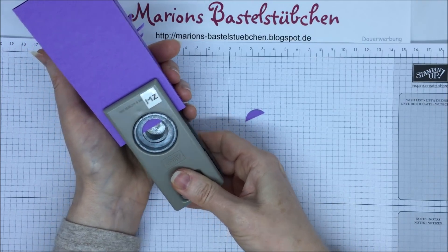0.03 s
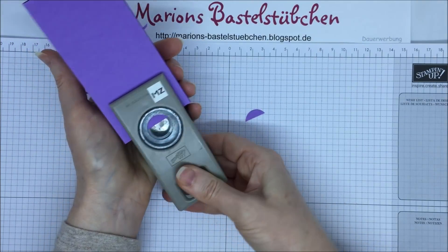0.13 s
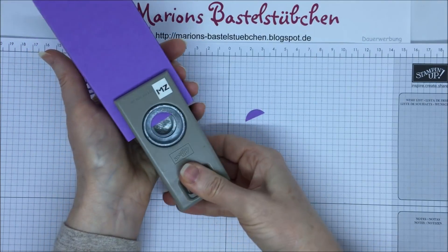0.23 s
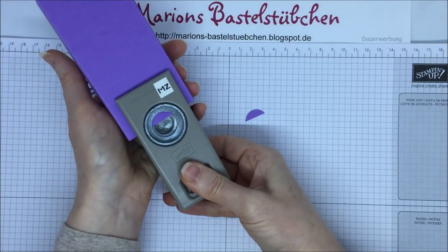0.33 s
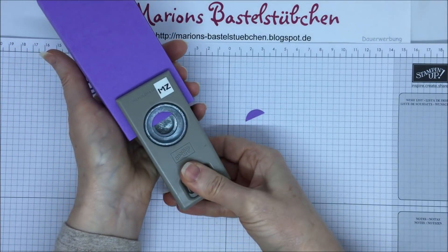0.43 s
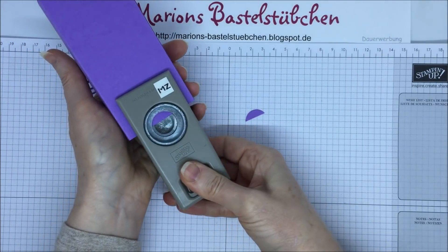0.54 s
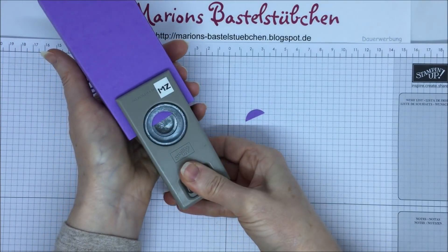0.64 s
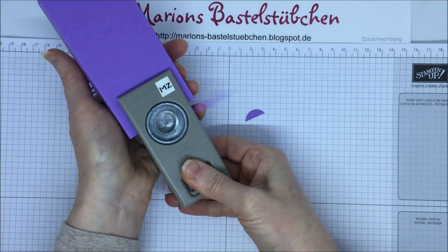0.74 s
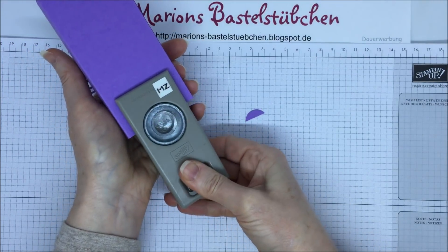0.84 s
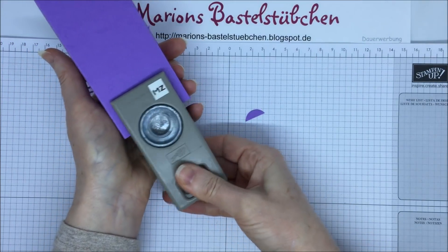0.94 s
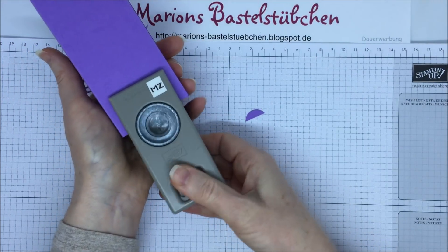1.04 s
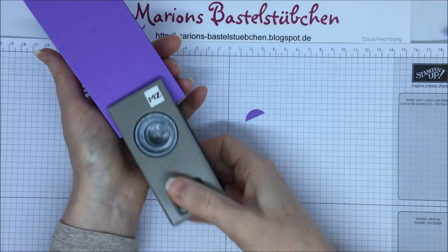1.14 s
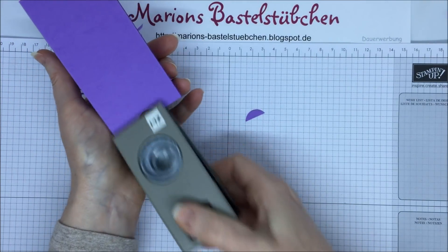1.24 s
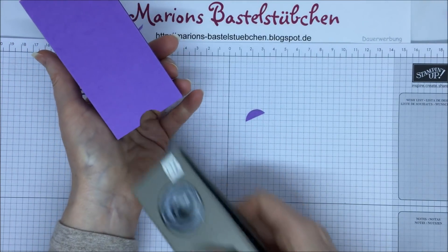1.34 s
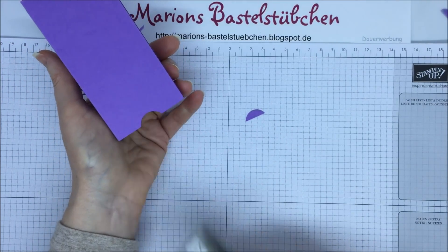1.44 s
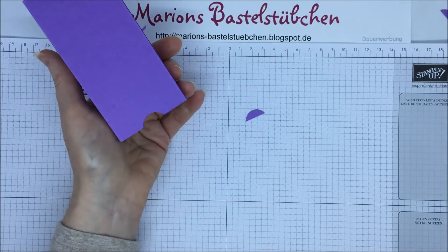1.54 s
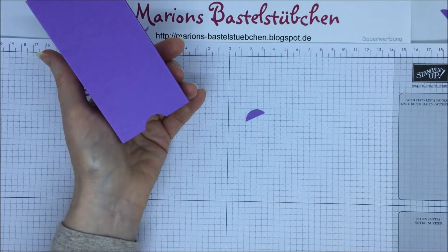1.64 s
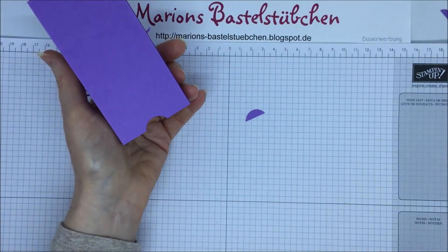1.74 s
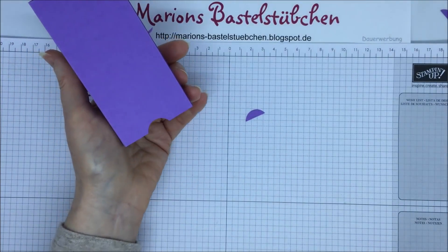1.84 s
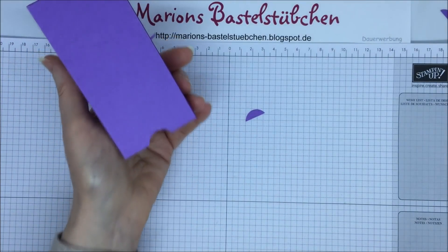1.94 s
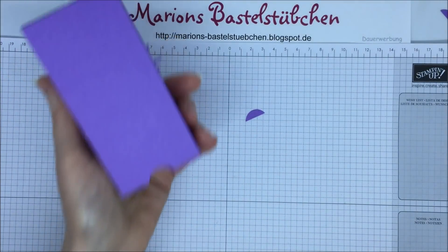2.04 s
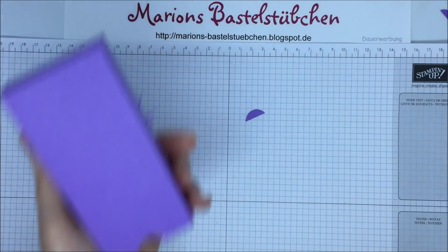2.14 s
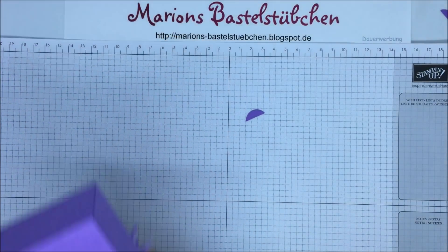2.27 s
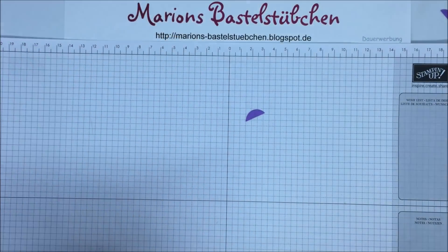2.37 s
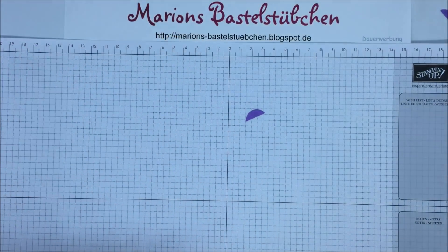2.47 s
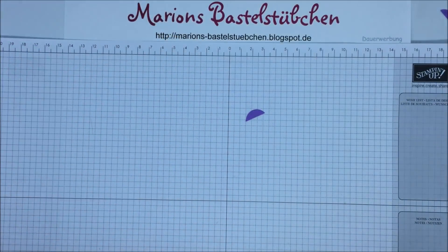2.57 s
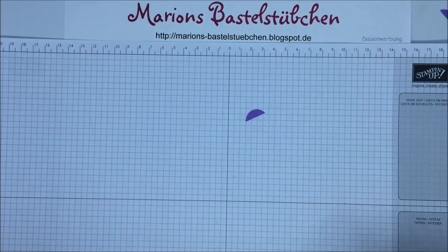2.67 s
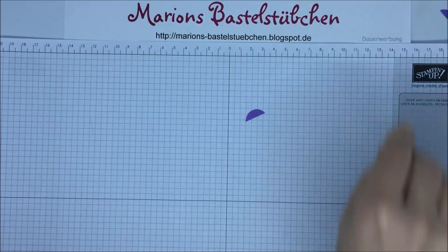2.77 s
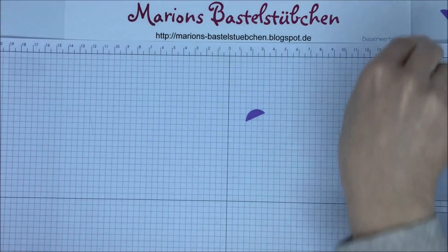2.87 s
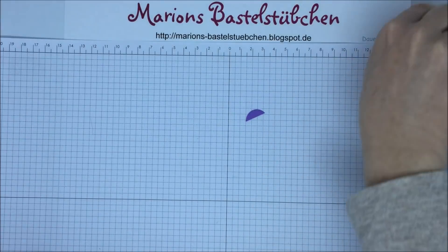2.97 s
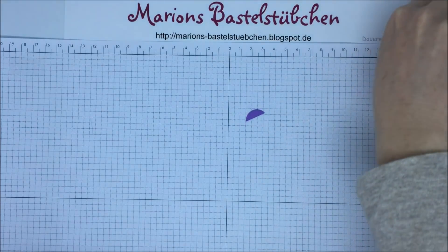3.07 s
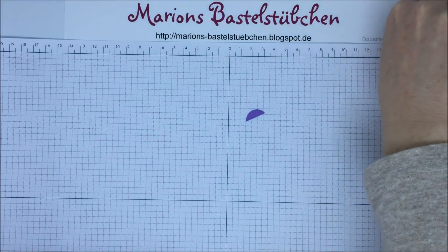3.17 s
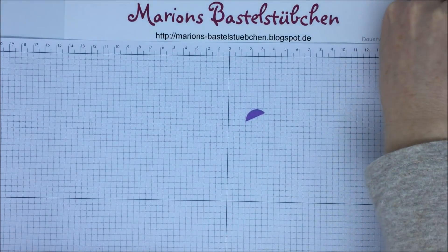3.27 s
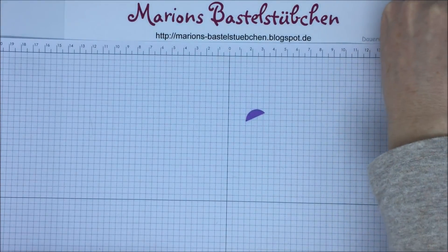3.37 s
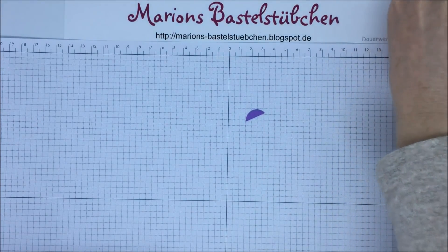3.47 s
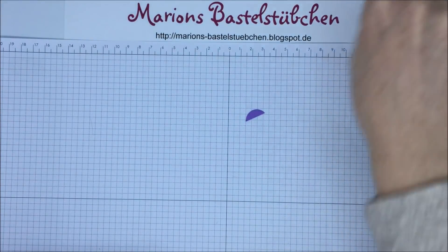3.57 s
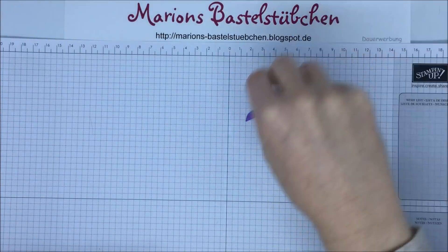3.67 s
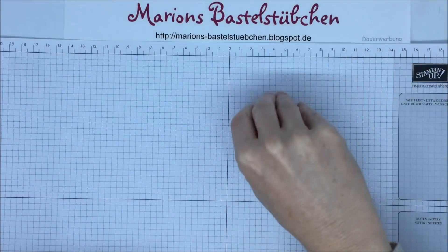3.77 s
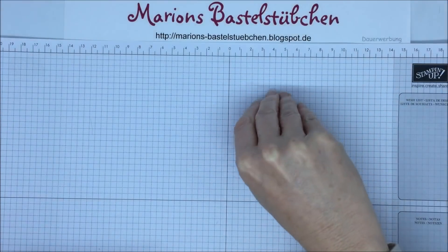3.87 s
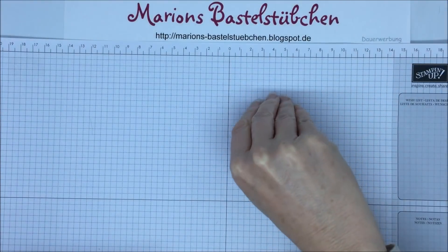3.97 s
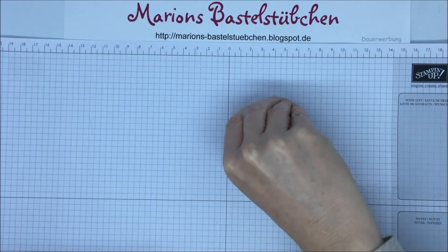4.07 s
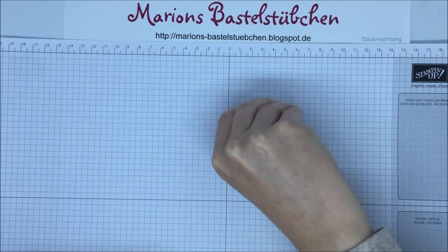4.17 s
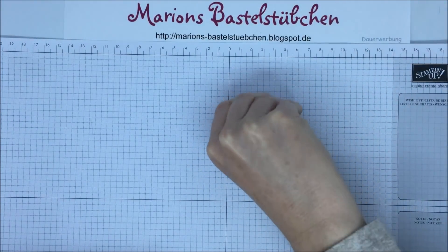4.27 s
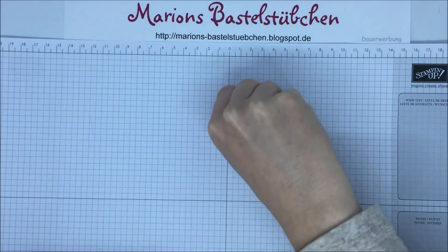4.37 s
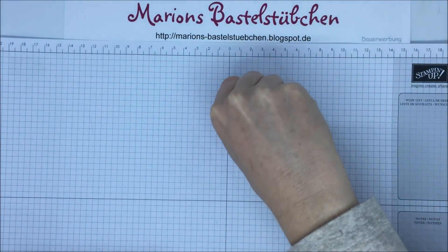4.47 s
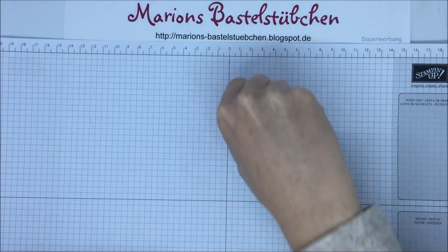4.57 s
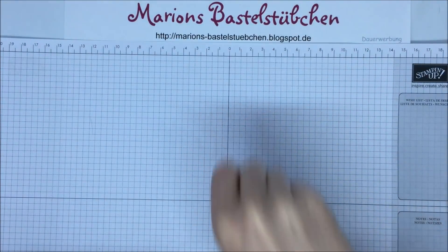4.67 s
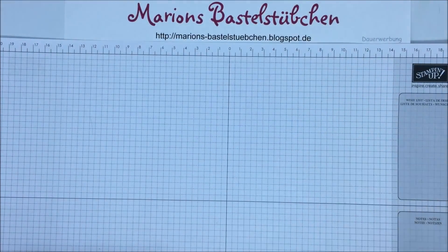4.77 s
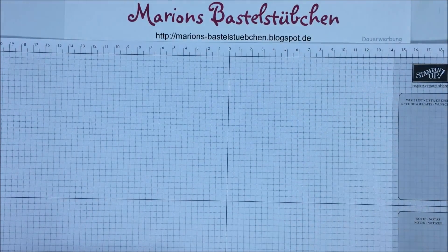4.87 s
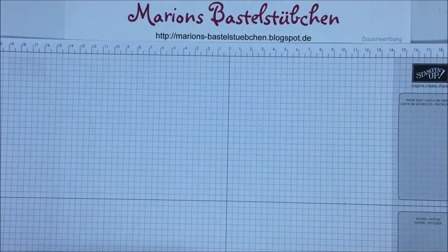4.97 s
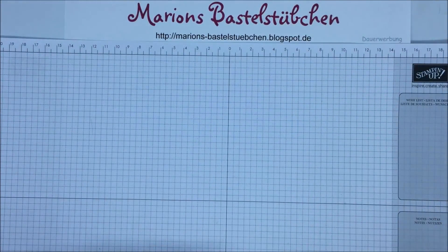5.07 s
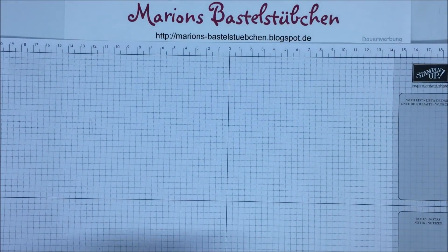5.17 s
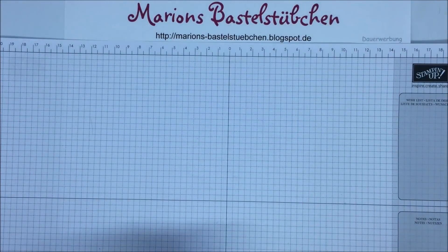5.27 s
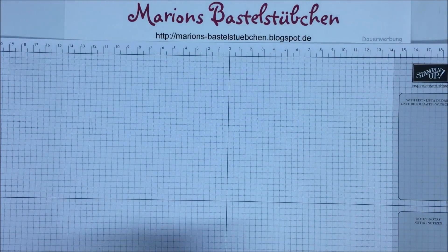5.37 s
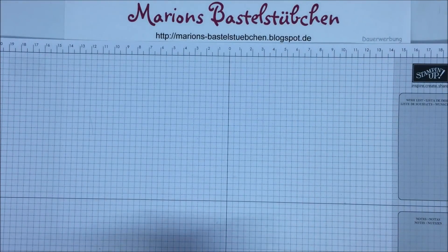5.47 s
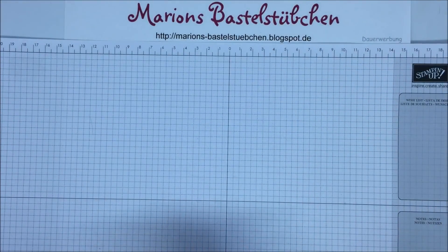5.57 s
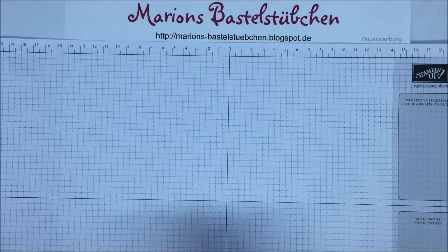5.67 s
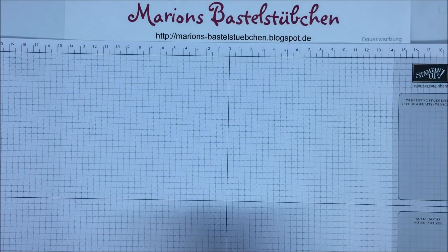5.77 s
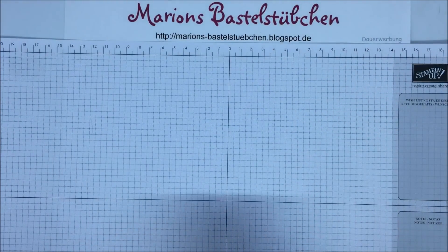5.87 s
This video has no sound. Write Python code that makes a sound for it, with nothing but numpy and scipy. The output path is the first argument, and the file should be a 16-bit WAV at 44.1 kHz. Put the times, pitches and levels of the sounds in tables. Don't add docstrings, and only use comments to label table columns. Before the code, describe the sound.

Hard double metallic snap of a craft punch close by, brief card scraping, a hollow clack and thump, then quiet paper ticks.

```python
import sys
import numpy as np
from scipy import signal
from scipy.fft import rfft, irfft, dct, next_fast_len
from scipy.io import wavfile
from scipy.ndimage import uniform_filter1d, map_coordinates

SR = 44100
rng = np.random.default_rng(int(sys.argv[2]) if len(sys.argv) > 2 else 0)


def convert_level_to_amplitude(level_db):
    exponent = np.asarray(level_db, float) / 20
    return 10 ** exponent


def wav_record(signal):
    frames = np.transpose(np.atleast_2d(signal))
    bounded = np.clip(frames, -1, 1)
    quanta = np.round(bounded * 32767).astype(np.int16)
    wavfile.write(sys.argv[1], SR, quanta)


N = 260565


def unit(x):
    return x / np.sqrt(np.mean(x ** 2) + 1e-20)


def peak_one(x):
    return x / np.max(np.abs(x))


def along(points, hz):
    f, v = np.transpose(points)
    return np.interp(np.log(hz + 1), np.log(f + 1), v)


def filtered(x, response):
    m = next_fast_len(x.shape[-1] + 8192)
    return irfft(rfft(x, m) * response(np.fft.rfftfreq(m, 1 / SR)), m)[..., :x.shape[-1]]


def band(f, lo_hz, hi_hz):
    return (1j * f / (lo_hz + 1j * f)) ** 2 / (1 + 1j * f / hi_hz) ** 2


def resonances(peaks):
    def response(f):
        total = 0
        for k, (center, width, db) in enumerate(peaks):
            damping = 1j * f * width
            total = total + (-1) ** k * convert_level_to_amplitude(db) * damping / (center * center - f * f + damping)
        return total
    return response


def noise(size, spectrum):
    return unit(filtered(rng.standard_normal(size), lambda hz: convert_level_to_amplitude(along(spectrum, hz))))


def wobble(rate):
    return map_coordinates(rng.standard_normal(int(N * rate / SR) + 4), [np.arange(N) * rate / SR])


# f/Hz, level per Hz/dB
HUM_COLOUR = [(12, -52), (22, -23), (44, -10), (70, -12.5), (113, 1), (145, -1.5), (167, -11.5),
              (233, -14.5), (268, -21.5), (407, -24.5), (890, -24.5), (2230, -27.5), (2570, -31.5),
              (2870, -29.5), (15800, -39)]


def hum():
    drift_db = 0.5 * wobble(1.5) + 0.6 * wobble(12)
    return convert_level_to_amplitude(-62.5 + drift_db) * noise(N, HUM_COLOUR)


def patchy(x, depth_db):
    z = signal.stft(x, nperseg=256)[2]
    field = uniform_filter1d(rng.standard_normal(z.shape), size=3, axis=0)
    field = uniform_filter1d(field, size=11, axis=1)
    return signal.istft(z * convert_level_to_amplitude(depth_db * unit(field)), nperseg=256)[1][:N]


def strokes(rows, attack, release):
    gains = np.zeros((3, N))
    for s, length, db, hiss_db, pad_db in rows:
        at = np.arange(round(s * SR), min(round((s + length) * SR), N))
        u = (at / SR - s) / length
        touch = np.clip(np.minimum(u / attack, (1 - u) / release), 0, 1) ** 2
        gains[:, at] += convert_level_to_amplitude(db + np.array([[0], [hiss_db], [pad_db]])) * touch
    return gains


def rubbing(gains, sheet, hiss, pad, grain_db):
    clumps = convert_level_to_amplitude(2.5 * wobble(60) + grain_db * wobble(400))
    sheet_grain = clumps * rng.standard_normal(N)
    pad_grain = clumps * rng.standard_normal(N)
    layers = [unit(filtered(sheet_grain, lambda f: resonances(sheet)(f) * band(f, 900, 5000))),
              unit(clumps * patchy(noise(N, hiss), depth_db=3.0)),
              unit(filtered(pad_grain, lambda f: resonances(pad)(f) ** 2))]
    return np.sum(gains * layers, axis=0)


# t/s, length/s, sheet level/dB, hiss over sheet/dB, pad over sheet/dB
SLEEVE_STROKES = [(0.148, 0.25, -76, 4.5, -7), (2.085, .105, -86, 12, 1), (2.885, .06, -84, 11, -6),
                  (2.7, .17, -76, -8, 9), (3.105, .03, -71, -12, -9), (2.966, .02, -82, 11, -4),
                  (4.4, 0.11, -79.5, 12, -3), (4.965, 0.1, -79, 11.5, -4), (5.665, 0.068, -70, 1, -5),
                  (5.545, .09, -73.5, 1, -3), (5.79, 0.07, -67, -4, -4.5)]
# t/s, length/s, sheet level/dB, hiss over sheet/dB, pad over sheet/dB
EDGE_FLICKS = [
    (3.214, 0.034, -72, -10, -24),
    (3.978, 0.052, -59, 1.5, -18),
    (5.378, 0.044, -59, 4.5, -26),
    (5.893, 0.041, -61.5, -1, 1.5),
]
# f/Hz, width/Hz, level/dB
EDGE_BODY = [(830, 330, -16), (1310, 270, 0.5), (2136, 460, 4), (3000, 250, -20)]
# f/Hz, level per Hz/dB
EDGE_HISS = [(1470, -22), (2500, -9), (3130, 2), (3700, -1), (7410, -4), (10400, -2), (11500, 1.5),
             (15800, -18)]
# f/Hz, width/Hz, level/dB
PAD_BODY = [(218, 80, 4.5), (555, 95, 2)]


def sleeve_and_edges():
    gains = strokes(SLEEVE_STROKES, attack=0.38, release=0.15)
    gains += strokes(EDGE_FLICKS, attack=0.15, release=0.44)
    return rubbing(gains, EDGE_BODY, EDGE_HISS, PAD_BODY, grain_db=2.0)


# t/s, level/dB, f/Hz, t60/s, snap over tick/dB
EDGE_TICKS = [(0.519, -57.5, 1900, 0.025, -11.5), (1.231, -34.5, 1690, 0.05, -10.5),
              (1.2994, -28, 1657, 0.026, -23), (1.3229, -14.5, 3800, 0.008, -20),
              (1.3242, -23, 2300, 0.02, -18), (1.3468, -33, 3800, 0.034, -14.5),
              (1.361, -29, 1800, 0.029, -15), (1.406, -29.5, 3810, 0.02, -10),
              (1.4322, -21, 2870, 0.011, -12), (1.6211, -49, 2242, 0.034, -30),
              (3.2779, -41, 2553, 0.022, -16), (3.217, -50, 4760, 0.07, -30),
              (4.2194, -51.5, 502, 0.032, -7), (5.384, -50.5, 1990, .03, -9),
              (4.4912, -42, 3000, 0.031, -23), (5.176, -56.5, 1100, 0.0199, -9)]
# f/Hz, level per Hz/dB
PAPER_HISS = [(1470, -18), (2500, 0), (2780, -14), (4030, -5), (4320, -3), (4670, -1), (7820, -5.5),
              (13600, -6), (15800, -16.5)]


def ticks():
    out, t = np.zeros(N + SR), np.arange(SR // 5) / SR
    for s, db, hz, t60, snap_db in EDGE_TICKS:
        fade = convert_level_to_amplitude(-60 * t / max(t60, 2e-3)) * (1 - np.exp(-t / 0.0003))
        puff = fade * rng.standard_normal(len(t))
        puff[9] += 4
        edge = resonances([(hz, 0.7 * hz, 0)])
        tone = filtered(puff, lambda f: edge(f) ** 2 * band(f, 0.1 * hz, 3 * hz))
        snap = fade * noise(len(t), PAPER_HISS)
        out[round(s * SR):][:len(t)] += convert_level_to_amplitude(db) * (peak_one(tone) + convert_level_to_amplitude(snap_db) * peak_one(snap))
    return out[:N]


# t/s, pressure level/dB
SLIDE_PRESSURE = [(1.255, -62), (1.285, -47.5), (1.303, -40), (1.325, -45), (1.338, -47), (1.35, -36),
                  (1.375, -37), (1.39, -38.5), (1.407, -40), (1.432, -40), (1.444, -62)]


def slide():
    s, db = np.transpose(SLIDE_PRESSURE)
    t = np.arange(N) / SR
    swing_db = np.interp(t, s, db) - db.mean()
    touch = np.clip(np.minimum(t - s[0], s[-1] - t) / 0.005, 0, 1)
    layers_db = np.array([swing_db, -9 + 1.1 * swing_db, -8 + swing_db])
    return touch * convert_level_to_amplitude(db.mean() + layers_db)


# t/s, length/s, sheet level/dB, hiss over sheet/dB, pad over sheet/dB
CARD_DRAGS = [(1.425, 0.049, -52, -22, -5.5), (1.317, .022, -51, -18, 4), (1.226, .02, -64, 4, 10),
              (3.274, .03, -58, -7, -1), (1.385, .07, -56, 4, -16), (3.29, .045, -58, 4, -8),
              (3.522, .08, -76.5, 7.5, -6), (.815, .045, -56.5, -17.5, -12.5), (3.33, 0.15, -66, 4, 2),
              (3.607, 0.037, -66, 8.5, -17)]
# f/Hz, width/Hz, level/dB
CARD_BODY = [(930, 90, 4), (1220, 90, 1), (1800, 150, 0), (2079.5, 82, -5), (2650, 90, -5), (2960, 110, -6),
             (3800, 200, -6)]
# f/Hz, level per Hz/dB
CARD_HISS = [(1470, -44), (2500, -9), (3460, -14), (3850, -5.5), (4250, -6), (8580, -11.5), (9190, -9),
             (15800, -20)]
# f/Hz, width/Hz, level/dB
CARD_LOW_BODY = [(209, 90, -4), (400, 120, -3), (546, 100, 2)]


def card_dragging():
    gains = slide() + strokes(CARD_DRAGS, attack=0.36, release=0.36)
    return rubbing(gains, CARD_BODY, CARD_HISS, CARD_LOW_BODY, grain_db=3.5)


# f/Hz, level per Hz/dB
CRACK_COLOUR = [(1470, -35.5), (2500, -2), (3380, -6), (4060, 0), (4810, -2), (6650, -5), (8980, -3),
                (10700, -7), (15800, -13.5)]


def blows(events, body, knock_top_hz, ring_low_hz, ring_top_hz, crack_share, soft):
    out, t = np.zeros(N + SR), np.arange(SR // 6) / SR
    low = [peak for peak in body if peak[0] < 700]
    high = [peak for peak in body if peak[0] >= 700]
    top_db = max(row[1] for row in events)
    for s, db, edge_db, low_db, t60 in events:
        rise = max(soft * 0.0005997 * np.exp(0.06 * (top_db - db)), 1e-4)
        onset = 1 - np.exp(-t / rise)
        force = rng.standard_normal(len(t)) * convert_level_to_amplitude(-60 * t / t60) * onset
        force[round(rise * SR)] += 7 * np.exp(-(rise / 0.0018) ** 2)
        knock = filtered(force, lambda f: resonances(low)(f) * band(f, 41, knock_top_hz))
        ring = filtered(force, lambda f: resonances(high)(f) * band(f, ring_low_hz, ring_top_hz))
        crack_fade = convert_level_to_amplitude(-60 * t / (crack_share * t60)) + 1.7 * convert_level_to_amplitude(-60 * t / 0.0035)
        crack = noise(len(t), CRACK_COLOUR) * onset * crack_fade
        blow = peak_one(ring) + convert_level_to_amplitude(low_db) * peak_one(knock) + convert_level_to_amplitude(edge_db) * peak_one(crack)
        out[round(s * SR):][:len(t)] += convert_level_to_amplitude(db) * blow
    return out[:N]


# t/s, level/dB, steel over ring/dB, low knock over ring/dB, t60/s
CUT_BLOWS = [
    (.846, -33, -14.5, -10.5, .045),
    (.858, -26, -30, -17.5, .072),
    (.8692, 3, -3.5, -15.5, .012),
    (.8725, 6, -11.5, -12, .014),
    (.8765, 0, -14.5, -12.5, .014),
    (.882, -13, -18, -1, .018),
]
# f/Hz, width/Hz, level/dB
PUNCH_BODY = [(243, 45, -9), (520, 55, 4), (945, 50, -1), (1234, 67, 3.5), (1485.4, 230, -1),
              (1980, 250, 1), (2504, 170, -5), (2900, 320, -18)]


def blade_cut():
    return blows(CUT_BLOWS, PUNCH_BODY, knock_top_hz=710, ring_low_hz=700, ring_top_hz=3000,
                 crack_share=3.6, soft=1.2)


# t/s, level/dB, f/Hz, t60/s
TABLE_SAGS = [
    (0.874, -44.5, 85, 0.12),
    (2.418, -45, 74.04, 0.23),
    (2.538, -44.5, 83, 0.121),
    (3.346, -40, 59.4, 0.12),
]


def table_sag():
    out = np.zeros(N)
    for s, db, hz, t60 in TABLE_SAGS:
        t = np.maximum(np.arange(N) / SR - s, 0)
        out += convert_level_to_amplitude(db) * peak_one(t * convert_level_to_amplitude(-60 * t / t60) * np.sin(2 * np.pi * hz * t))
    return out


# t/s, level/dB, steel over ring/dB, low knock over ring/dB, t60/s
TRAVEL_BLOWS = [
    (.8845, -15, -14, -18, .03),
    (.888, -18, -10, -14, .015),
]


def lever_travel():
    return blows(TRAVEL_BLOWS, PUNCH_BODY, knock_top_hz=705, ring_low_hz=900, ring_top_hz=2600,
                 crack_share=1.3, soft=2.5)


# t/s, level/dB, steel over ring/dB, low knock over ring/dB, t60/s
STOP_BLOWS = [
    (.8922, -9, -2, -13, .02),
    (.8945, 2, 3, -12, .016),
    (.898, -2.5, -7, -15, .025),
    (.904, -13, -9, -22, .04),
    (.919, -23, -9.5, -6, .013),
]
# f/Hz, width/Hz, level/dB
DIE_BODY = [(234, 110, -20), (560, 63, 2), (960, 110, -7.5), (1200.3, 180, -10), (1550, 270, -4.5),
            (2155, 300, 1.5), (2380, 350, 1), (3050, 1400, -11.5)]


def lever_stop():
    return blows(STOP_BLOWS, DIE_BODY, knock_top_hz=700, ring_low_hz=700, ring_top_hz=3500,
                 crack_share=1.4, soft=1.1)


# f/Hz, level per Hz/dB
WALL_COLOUR = [(180, -56), (330, -26), (515, 3), (700, -13), (1050, 0), (1700, -1), (2600, -5), (3100, -16),
               (4400, -14), (15000, -44)]


def walls_answer(start_s, level_db, t60_s, rise_s):
    t = np.maximum(np.arange(N) / SR - start_s, 0)
    return convert_level_to_amplitude(level_db - 60 * t / t60_s) * (1 - np.exp(-t / rise_s)) * noise(N, WALL_COLOUR)


# t/s, level/dB, steel over ring/dB, low knock over ring/dB, t60/s
RETURN_BLOWS = [
    (1.088, -41, -19.5, -0.5, 0.11),
    (1.1195, -33.5, -1, -13, 0.028),
    (1.124, -29, -15.5, -20, 0.06),
    (1.1385, -16, -9, -31, 0.011),
    (1.1405, -18, -3, -20, 0.03),
    (1.147, -24, -10, -16, 0.085),
    (1.182, -38, -14, -2, 0.18),
]
# f/Hz, width/Hz, level/dB
LEVER_BODY = [(228, 21, -12.5), (547, 63, 3.5), (922.3, 130, -1), (1190, 200, -1.5), (1627.6, 126, 3),
              (1955, 270, 2.5), (2882, 610, -10.5), (3780, 405, -12)]


def spring_return():
    return blows(RETURN_BLOWS, LEVER_BODY, knock_top_hz=704, ring_low_hz=806, ring_top_hz=3480,
                 crack_share=1.05, soft=1.5)


def ringing(hits, modes):
    out, t = np.zeros(N + SR), np.arange(SR // 3) / SR
    hz, level, t60 = np.transpose(modes)[:, :, None]
    for s, db, rise in hits:
        chance = rng.standard_normal((2, len(modes), 1))
        fade = convert_level_to_amplitude(level + 0.7 * chance[0] - 60 * t / t60)
        ring = fade * np.sin(2 * np.pi * hz * t + 0.3 * chance[1])
        out[round(s * SR):][:len(t)] += convert_level_to_amplitude(db) * (1 - np.exp(-t / max(rise, 1e-4))) * ring.sum(axis=0)
    return out[:N]


# t/s, level/dB, rise/s
LEVER_HITS = [
    (1.1392, -9, .002),
]
# f/Hz, level/dB, t60/s
LEVER_MODES = [(554, -22, .08), (915, -14, .08), (1160, -8, .035), (1680, -4, .05), (2008, 0, .028),
               (2654, -19, .045), (2961, -20, .03), (3451, -18, .035), (3849, -20, .04)]


def lever_ringing():
    return ringing(LEVER_HITS, LEVER_MODES)


# t/s, length/s, f/Hz, level/dB
NARROW_TONES = [(1.272, .034, 7200, -47), (1.27, .016, 1150, -40), (1.297, .016, 3800, -38),
                (1.346, .009, 6250, -42), (1.345, .02, 3100, -38), (1.358, .016, 1600, -29),
                (1.378, .018, 1900, -34), (1.39, .014, 2660, -38), (1.399, .024, 3870, -37),
                (1.366, .012, 1000, -35), (1.33, .012, 1200, -37), (3.323, .016, 1250, -37),
                (2.3995, .014, 2250, -21), (3.324, .02, 700, -38), (3.33, .05, 170, -34),
                (3.44, .03, 1800, -54), (3.612, .028, 5600, -58), (2.66, .12, 450, -56), (4, .04, 2300, -53),
                (4.005, .035, 5000, -56), (4.07, .04, 8400, -60), (1.402, .014, 620, -36),
                (1.414, .014, 2600, -38), (1.43, .008, 2290, -30), (3.278, .016, 2600, -48),
                (3.378, .034, 970, -44), (3.448, .026, 1000, -52), (3.335, .045, 4300, -60),
                (3.612, .026, 2800, -60), (3.21, .035, 2000, -61), (3.978, .03, 2080, -52),
                (3.978, .04, 4700, -57), (3.985, .04, 3950, -56), (3.982, .03, 5650, -57),
                (3.98, .025, 6400, -58), (4.03, .09, 2150, -60), (4.175, .06, 2100, -60),
                (4.18, .03, 5450, -60), (4.205, .04, 4720, -59), (4.21, .05, 7000, -61),
                (4.235, .06, 5500, -62), (4.25, .05, 2200, -60), (4.26, .045, 4700, -61),
                (4.265, .04, 1300, -54), (5.376, .035, 1970, -54), (5.376, .03, 2970, -59),
                (5.376, .03, 4710, -61), (5.376, .03, 5840, -62), (5.376, .03, 7510, -63),
                (5.376, .03, 11200, -58)]


def narrow_tones():
    out, t = np.zeros(N + SR), np.arange(SR // 8) / SR
    for s, length, hz, db in NARROW_TONES:
        u = t / length
        touch = np.clip(np.minimum(u / 0.25, (1 - u) / 0.75), 0, 1) ** 0.7
        edge = resonances([(hz, 260, 0)])
        sung = filtered(rng.standard_normal(len(t)), lambda f: edge(f) ** 2)
        out[round(s * SR):][:len(t)] += convert_level_to_amplitude(db - 6) * touch * unit(sung)
    return out[:N]


# t/s, length/s, sheet level/dB, hiss over sheet/dB, pad over sheet/dB
HAND_STROKES = [(1.42, .06, -62, -20, 16), (2.94, .15, -62, -14, -9), (3.995, .055, -58, 5, -2),
                (4.02, .1, -59, -13, 4), (4.065, .06, -76, 9, 12), (4.16, .07, -60, 3, 2),
                (4.2, .06, -64, 3, 8), (4.225, .13, -61, -3, 1), (4.3, .14, -70, -5, 6),
                (4.37, .08, -80, 8, 14), (4.44, .31, -71, -7, 5), (4.445, .06, -60, -16, 0),
                (4.625, .09, -65, -8, -4), (4.482, .045, -48, -10, -8), (4.704, .08, -57, -3, -8),
                (5.893, .04, -57, 1, -10)]
# f/Hz, width/Hz, level/dB
SHEET_BODY = [(876, 12, 3.5), (1271, 34.4, 6.5), (1780, 120, -10.5), (1950, 200, -10), (3000, 1570, -17.5)]


def hand_on_paper():
    gains = strokes(HAND_STROKES, attack=0.2, release=0.52)
    return rubbing(gains, SHEET_BODY, PAPER_HISS, PAD_BODY, grain_db=2.0)


# t/s, level/dB, edge over ring/dB, low knock over ring/dB, t60/s
BOX_BLOWS = [
    (2.4005, -14, -24, -12, 0.039),
    (2.4055, -17.5, -36.5, -16, 0.018),
    (2.416, -24.5, -33, -6.5, 0.043),
    (2.438, -44.5, -19, 11, 0.024),
]
# f/Hz, width/Hz, level/dB
BOX_BODY = [(246.9, 62, 6), (480, 190, -19), (820, 120, -14), (1020, 74, -5), (1486, 120, -5),
            (1694, 95, -4), (2033, 244, 1), (2414, 205, -1), (3262, 820, -20)]


def box_clack():
    return blows(BOX_BLOWS, BOX_BODY, knock_top_hz=350, ring_low_hz=1150, ring_top_hz=3420,
                 crack_share=0.851, soft=1.3)


# t/s, level/dB, edge over ring/dB, low knock over ring/dB, t60/s
TABLE_BLOWS = [
    (2.528, -25, -10, 0, 0.013),
    (2.532, -20, -5, -1, 0.02),
    (2.5375, -21, -8, -5, 0.021),
    (2.542, -21, -14, -8, 0.025),
    (2.566, -41, -8, 14, 0.09),
    (2.613, -45, -40, -30, 0.05),
]
# f/Hz, width/Hz, level/dB
TABLE_BODY = [(128.8, 140, -8.5), (185, 38, -5.5), (242, 42, 3), (335.4, 240, -6.5), (485, 50, -3),
              (630, 73, -6.5), (780, 90, 2.5), (1024, 62, 7), (1360, 110, 5), (1630, 420, 0),
              (2020, 250, 4.5), (2420, 700, -6.5), (3290, 230, -5)]


def table_thump():
    return blows(TABLE_BLOWS, TABLE_BODY, knock_top_hz=700, ring_low_hz=600, ring_top_hz=3000,
                 crack_share=1.2, soft=1.1)


# t/s, level/dB, rise/s
BOX_HITS = [
    (2.529, -11.5, .003),
    (2.5415, -27, .001),
]
# f/Hz, level/dB, t60/s
BOX_MODES = [(248, 0, .075), (330, -8, .06), (614, -11, .09), (1028, -11, .08), (1330, -9, .06),
             (1560, -14, .05), (1992, -21, .17), (2089, -19, .1), (2300, -15, .04), (2649, -31, .2),
             (3290, -18, .04), (100, -13, .1)]


def box_ringing():
    return ringing(BOX_HITS, BOX_MODES)


# t/s, level/dB, edge over ring/dB, low knock over ring/dB, t60/s
SCRAP_BLOWS = [
    (3.3238, -27, 0, 2, 0.04),
    (3.38, -45, -12, 3, 0.12),
    (3.443, -49, -5.5, 7, 0.09),
]
# f/Hz, width/Hz, level/dB
SCRAP_BODY = [(143, 19, 3.5), (205, 37, 4), (351, 110, -4), (540, 60, -3), (934, 100, -3), (1350, 440, -1),
              (1900, 2430, -6), (2676, 340, -2.5)]


def scrap_drop():
    return blows(SCRAP_BLOWS, SCRAP_BODY, knock_top_hz=695, ring_low_hz=693, ring_top_hz=4000,
                 crack_share=0.9, soft=1.1)


# f/Hz, t60/s
ROOM_DECAY = [(150, 0.24), (600, 0.22), (1200, 0.36), (2500, 0.24), (5000, 0.28), (9000, 0.28),
              (15000, 0.24)]


def room(x, dull_hz=9000):
    hz, t, z = signal.stft(rng.standard_normal(SR // 2), SR, nperseg=256)
    dull = 1 / (1 + (hz / dull_hz) ** 2)
    fade = convert_level_to_amplitude(-60 * t / along(ROOM_DECAY, hz)[:, None])
    tail = signal.istft(z * dull[:, None] * fade, SR, nperseg=256)[1]
    return signal.fftconvolve(np.pad(x, (300, 0)), tail / np.linalg.norm(tail))[:N]


def scene():
    punch = blade_cut() + lever_stop() + spring_return()
    clack, thump = box_clack(), table_thump()
    card = card_dragging()
    small = sleeve_and_edges() + ticks() + hand_on_paper() + scrap_drop()
    echo = convert_level_to_amplitude(-27.0) * room(punch) + convert_level_to_amplitude(-17.5) * room(clack)
    echo += convert_level_to_amplitude(-15.5) * room(thump, dull_hz=3000)
    echo += convert_level_to_amplitude(-20.5) * room(small + convert_level_to_amplitude(-12) * card)
    echo += walls_answer(start_s=0.9, level_db=-33, t60_s=0.52, rise_s=0.012)
    echo += walls_answer(start_s=2.54, level_db=-45.5, t60_s=0.5, rise_s=0.015)
    mix = hum() + small + card + punch + clack + thump + echo
    mix += table_sag() + lever_travel() + lever_ringing() + narrow_tones() + box_ringing()
    return mix[None]


# t/s, lowest f/Hz affected
THIN_MOMENTS = [(.49, 1500), (.99, 3000), (1.093, 3000), (1.285, 4300), (1.46, 2500), (1.77, 3000),
                (1.96, 3000), (2.08, 3000), (2.225, 3000), (2.52, 1500), (3.205, 800), (3.487, 1500),
                (3.995, 1500), (4.553, 2500), (4.785, 2000), (5.342, 1200), (5.408, 1200), (5.617, 2800),
                (5.662, 2800)]


def thin_treble(x):
    size = 1024
    out, taper = x.copy(), np.sin(np.pi * (np.arange(size) + 0.5) / size)
    hz = np.arange(size) * SR / (2 * size)
    for s, low_hz in THIN_MOMENTS:
        start = round(s * SR) - size // 2
        at = slice(start, start + size)
        lines = dct(taper * x[at], type=4, norm="ortho")
        nearby = np.sqrt(np.abs(uniform_filter1d(lines ** 2, size=60)))
        treble = hz > low_hz
        weak = treble & (np.abs(lines) < 2.3 * nearby * (1 + (hz / 9140) ** 4))
        strong = treble & ~weak
        out[at] -= taper * dct(lines * (weak - 1.0 * strong), type=4, norm="ortho")
    return out


def low_pass(x):
    return signal.sosfilt(signal.butter(12, 15910, fs=SR, output="sos"), x)


def record(dry):
    dip = resonances([(10500, 900, 0)])
    heard = filtered(dry[0], lambda f: (1 - 0.5 * dip(f)) * 1j * f / (30 + 1j * f))
    clipped = heard / (1 + np.abs(heard) ** 12) ** (1 / 12)
    mix = thin_treble(clipped)[None]
    return low_pass(mix)


dry = scene()
out = record(dry)
wav_record(out)
```